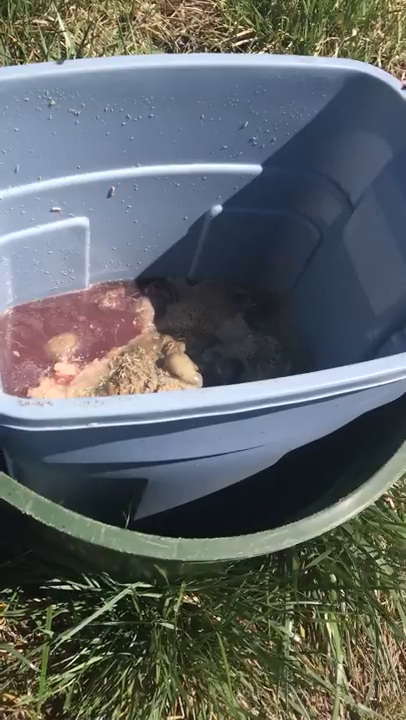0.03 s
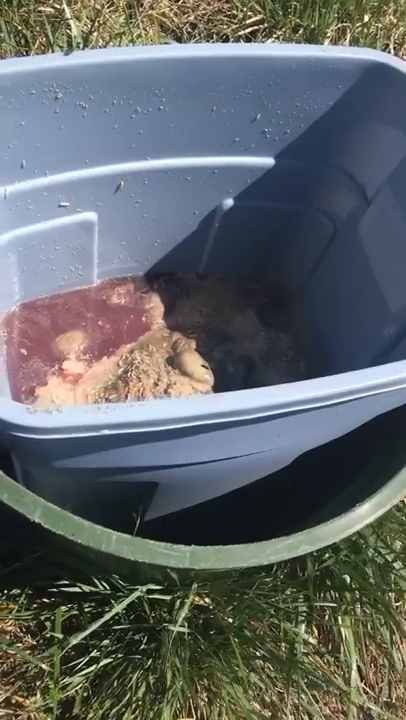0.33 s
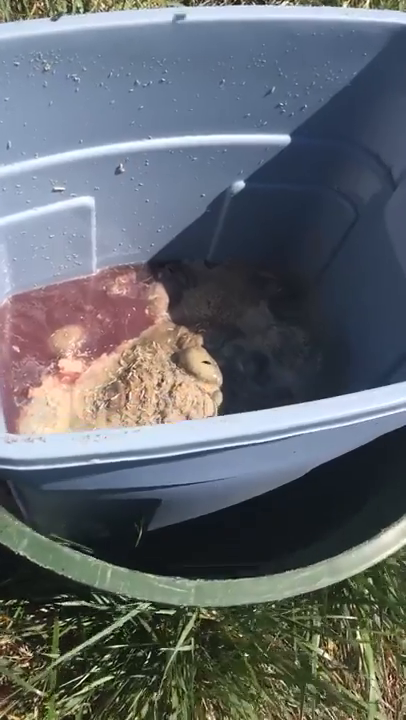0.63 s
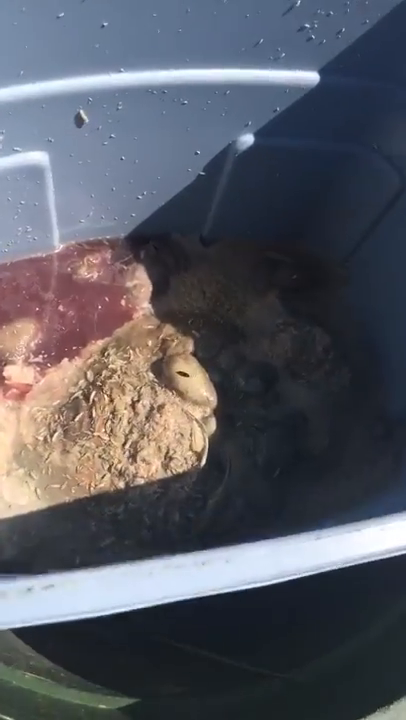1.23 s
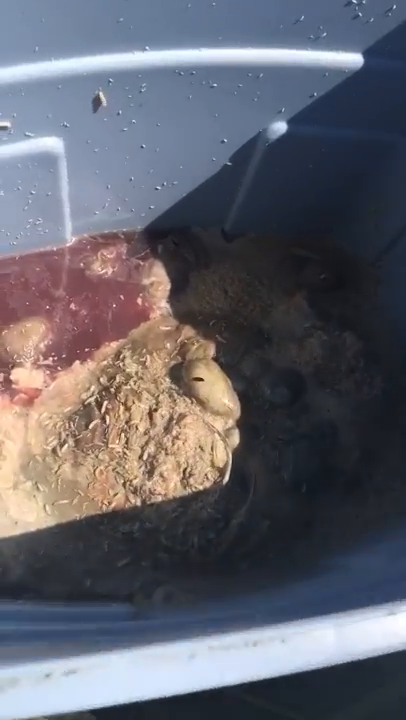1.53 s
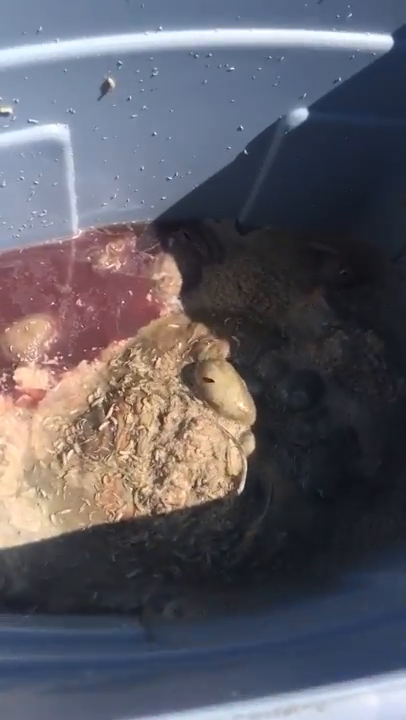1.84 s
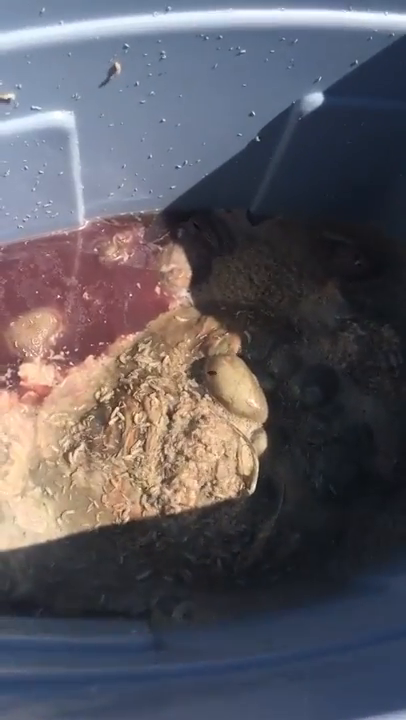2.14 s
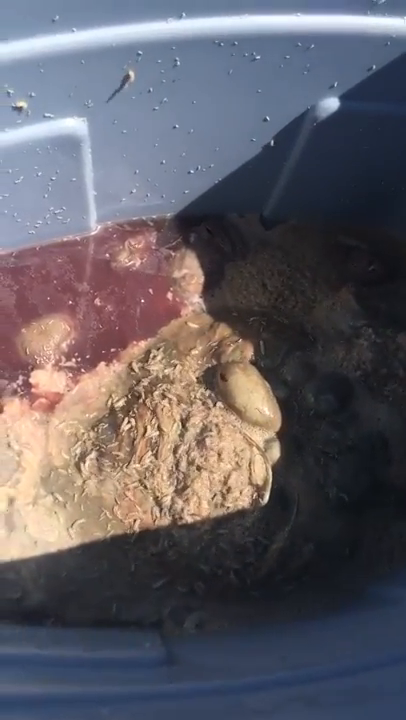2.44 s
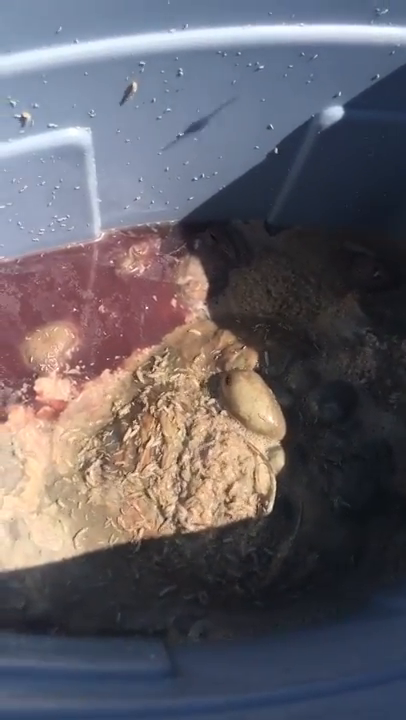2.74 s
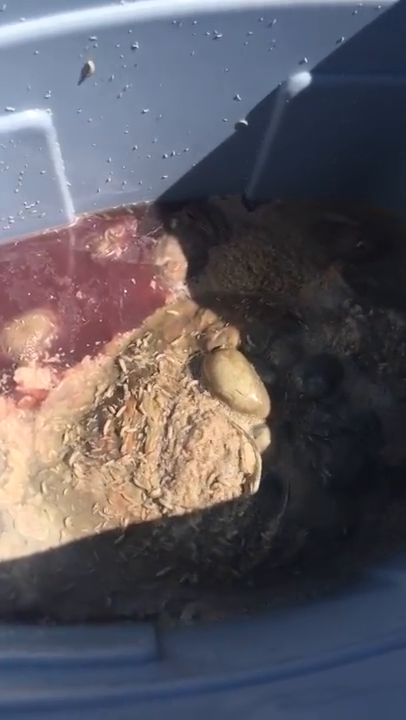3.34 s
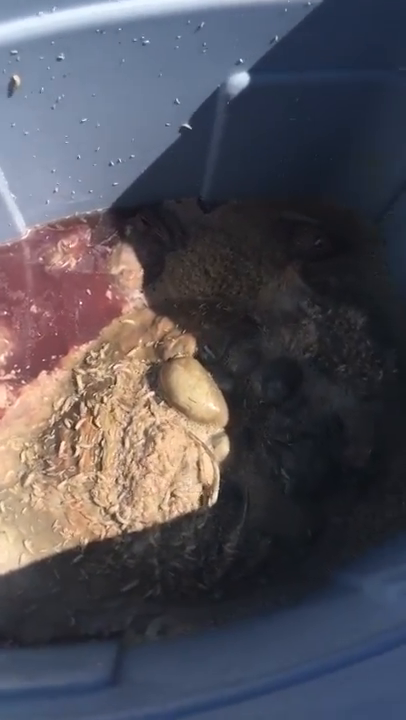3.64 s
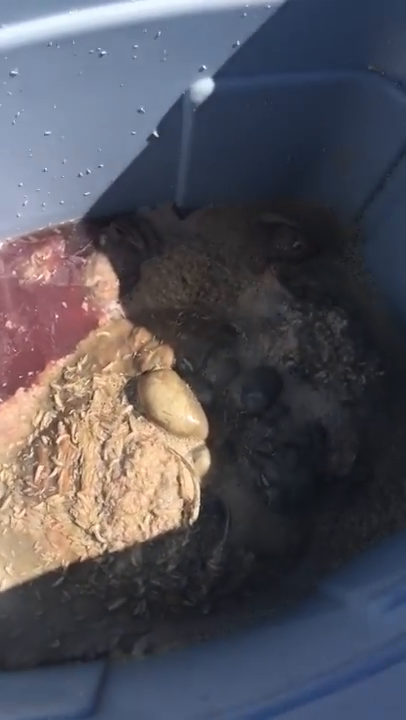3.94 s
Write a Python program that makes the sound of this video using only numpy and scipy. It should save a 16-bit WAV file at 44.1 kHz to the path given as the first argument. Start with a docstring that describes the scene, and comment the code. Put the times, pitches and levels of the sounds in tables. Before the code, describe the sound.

A low, uneven wind rumble blows on a microphone held over a plastic bin outdoors. Grass or a sleeve rustles briefly with faint ticks, then the plastic clicks once sharply, and the gusts swell again near the end.

```python
"""A quiet lawn, with a phone microphone leaned over a plastic bin.
Light wind buffets the microphone in low gusts. A sleeve or grass brushes past twice, its fibres
catching and slipping, and small ticks follow. Close by, the plastic cracks and rings in one sharp click.
A faint hush of distant air and the microphone's own hiss lie underneath."""
import sys
import numpy as np
from scipy import signal
from scipy.fft import rfft, irfft
from scipy.io import wavfile
from scipy.ndimage import uniform_filter1d

SR = 44100
rng = np.random.default_rng(int(sys.argv[2]) if len(sys.argv) > 2 else 0)


def digitize_waveform(pressure):
    """Quantize a signal to 16-bit integers and store it at the path in sys.argv[1].

    Rows of a 2-D input are taken as channels; values are limited to [-1, 1].
    """
    field = np.atleast_2d(pressure).T
    bounded = np.clip(field, -1, 1)
    quanta = np.round(bounded * 32767).astype(np.int16)
    wavfile.write(sys.argv[1], SR, quanta)


N = 176400


# Spectra of the wind's deep rumble and of its faster eddies: frequency_hz, gain_db
RUMBLE_SPECTRUM = [(10, -1.5), (25, 1), (40, -2), (60, -5), (90, -11), (130, -18.5), (200, -33), (400, -64),
                   (1500, -120)]
EDDY_SPECTRUM = [(50, -14), (100, -1.5), (150, -0.5), (220, -5), (300, -15.5), (420, -22), (700, -42),
                 (1500, -75), (4000, -110)]
# Gusts right on the microphone: peak_s, half_length_s, rumble_db, eddy_db
MIC_GUSTS = [(0.338, 0.028, -35.5, -57), (0.415, 0.049, -41, -63), (0.543, 0.034, -38, -62),
             (0.62, 0.0081, -27.5, -44.5), (0.669, 0.019, -32, -48), (0.731, 0.019, -36.5, -39),
             (0.8, 0.047, -42, -60), (0.934, 0.019, -41.5, -68), (1.185, 0.048, -39, -57.5),
             (1.276, 0.02, -39.5, -66), (1.33, .018, -36.5, -74), (1.665, 0.028, -44.5, -71),
             (1.94, 0.019, -45, -63.5), (2.112, 0.037, -42.5, -67.5), (2.38, 0.016, -43, -83),
             (2.648, 0.043, -44.5, -68.5), (3.055, 0.095, -42.5, -69.5), (3.53, 0.024, -41, -53),
             (3.577, 0.024, -28.5, -46), (3.634, 0.0076, -32.5, -46), (3.68, 0.036, -39, -63),
             (3.808, 0.059, -39, -59), (3.887, 0.0086, -32, -55)]

def wind(t, breeze_rumble_db=-50, breeze_eddy_db=-69, flutter_db=2.5, flutter_hz=29.72):
    """A steady breeze and short gusts press on the microphone and shed faster, fluttering eddies."""
    rumble_power, eddy_power = undb(breeze_rumble_db) ** 2, undb(breeze_eddy_db) ** 2
    for peak_s, half_length_s, rumble_db, eddy_db in MIC_GUSTS:
        swell = bell(t, peak_s, half_length_s)
        rumble_power += (swell * undb(rumble_db)) ** 2
        eddy_power += (swell * undb(eddy_db)) ** 2
    rumble = np.sqrt(rumble_power) * noise(RUMBLE_SPECTRUM)
    eddies = np.sqrt(eddy_power) * noise(EDDY_SPECTRUM)
    return rumble + eddies * undb(flutter_db * wander(flutter_hz))


# Spectrum of a bright snap, in the click and in the ticks: frequency_hz, gain_db
SNAP_SPECTRUM = [(1500, 6), (3300, -0.5), (5500, 2.5), (8000, -1.5), (11000, 1), (14300, 5), (16000, -4.5)]
# Modes the plastic rings with: pitch_hz, gain_db, t60_s
PLASTIC_MODES = [(402, -24, 0.021), (765, -14, 0.02), (1190, -4, 0.011), (1496, -1, 0.015),
                 (3490, -3, 0.0043), (5300, -5, 0.0058), (11840, -10, 0.012), (14600, -11, .008)]
# Cracks close to the microphone (a light touch, the slip, the stop): start_s, level_db
CLICK_CRACKS = [(1.8118, -62), (1.8130, -41), (1.8141, -39.5)]

def plastic_click(ring_start_s=1.8136, ring_db=-37.5, tail_gain_db=-19):
    """Close by, quick cracks with a short bright tail; the damped plastic rings for some milliseconds."""
    out = np.zeros(N)
    ringing = sum(undb(gain_db) * ring(pitch_hz, t60_s) for pitch_hz, gain_db, t60_s in PLASTIC_MODES)
    add(out, ring_start_s, undb(ring_db) * ringing)
    for start_s, level_db in CLICK_CRACKS:
        crack = burst(SNAP_SPECTRUM, decay_s=0.00058)
        tail = undb(tail_gain_db) * burst(SNAP_SPECTRUM, decay_s=0.0051)
        add(out, start_s, undb(level_db) * (crack + tail))
    return out


# Spectra of the rustle's bright scratch and hollow body: frequency_hz, gain_db
SCRATCH_SPECTRUM = [(1200, 10), (2300, -6), (3300, 0.5), (4300, 1), (5500, -1.5), (8000, -4.5),
                    (10500, 0.5), (13800, 2.5), (16000, -0.5)]
BODY_SPECTRUM = [(300, -16), (600, -5), (950, -10.5), (1250, -1.5), (1520, -2.5), (1850, -8.5),
                 (2300, -19.5), (4000, -27), (12000, -62)]
# Two strokes past the microphone, then faint stirring: time_s, scratch_db, body_db
BRUSH_LEVELS = [(0.25, -81.5, -74.5), (0.34, -75, -68.5), (0.39, -80, -74), (0.45, -85, -77),
                (0.50, -77.5, -68), (0.56, -67, -66), (0.59, -72.5, -69), (0.636, -61, -58.5),
                (0.657, -75.5, -62.5), (0.681, -60.5, -62), (0.73, -70.5, -65.5), (0.79, -73, -69.5),
                (0.84, -82.5, -73.5), (1.0, -89, -83.5), (1.1, -88, -76.5), (1.24, -88.5, -84),
                (1.35, -95, -97), (3.5, -110, -110), (3.82, -89, -83)]

def rustle(t, fade_in_s=0.26, flicker_db=2.5, flicker_hz=89.83, catch_db=2.35, catch_hz=151.5):
    """Fibres catch and slip, each group at its own pitch: a bright scratch over a hollow resonance."""
    def slips():
        return grains(per_s=1500, spread_db=2) * undb(flicker_db * wander(flicker_hz))

    fibres = np.zeros(N)
    for hz in np.geomspace(2400, 14500, num=10):
        band = [(hz / 2, -30), (hz / 1.15, -6), (hz, 0), (hz * 1.15, -6), (hz * 2, -30)]
        fibres += np.sqrt(hz) * colour(slips(), band)
    time_s, scratch_db, body_db = np.array(BRUSH_LEVELS).T
    scratch = undb(np.interp(t, time_s, scratch_db)) * colour(fibres, SCRATCH_SPECTRUM)
    body = undb(np.interp(t, time_s, body_db)) * colour(slips(), BODY_SPECTRUM)
    contact = np.minimum(t / fade_in_s, 1) ** 2
    return contact * (scratch + body) * undb(catch_db * wander(catch_hz))


# Small handling ticks at the bin: start_s, snap_db, snap_centre_hz, knock_db
HANDLING_TICKS = [(0.1925, -73, 1900, -48), (0.288, -67, 5000, -81), (0.3466, -63, 13000, -74),
                  (0.3639, -73, 3000, -50.5), (0.396, -78, 3000, -56), (0.5378, -67.5, 1900, -49),
                  (0.598, -55.5, 12900, -70), (0.64, -59, 4200, -64), (0.666, -55, 12000, -54),
                  (0.7643, -60, 9500, -74), (0.771, -74, 3000, -58), (0.802, -62, 12000, -73),
                  (0.8485, -79, 4000, -61.5), (0.8746, -72, 3600, -53), (0.9085, -55.5, 12300, -55),
                  (0.923, -63, 13500, -68), (1.169, -67.5, 5470, -84), (1.190, -66, 9800, -74),
                  (1.201, -67, 7500, -76), (1.227, -69, 5940, -86), (1.389, -64, 11600, -73),
                  (1.404, -64.5, 9000, -56.5), (1.433, -71, 11000, -58.5), (1.5054, -66.5, 13000, -82),
                  (1.624, -66.5, 8400, -82), (1.651, -68, 5500, -79), (1.678, -71.5, 13500, -84),
                  (1.765, -72, 9000, -82), (2.758, -72, 3200, -74), (3.325, -75, 12000, -80),
                  (3.563, -70.5, 3200, -71), (3.6758, -62.5, 13100, -72), (3.792, -67.5, 2600, -64),
                  (3.817, -76, 13000, -82), (3.835, -73, 11000, -82)]

def ticks(knock_hz=1395, pitch_spread=0.075):
    """Each tick is a bright snap with a short hollow knock, a little different in pitch every time."""
    out = np.zeros(N)
    pitches_hz = knock_hz * (1 + pitch_spread * rng.standard_normal(len(HANDLING_TICKS)))
    for (start_s, snap_db, snap_centre_hz, knock_db), pitch_hz in zip(HANDLING_TICKS, pitches_hz):
        spectrum = with_resonance(SNAP_SPECTRUM, snap_centre_hz)
        add(out, start_s, undb(snap_db) * burst(spectrum, decay_s=0.0029))
        add(out, start_s, undb(knock_db) * ring(pitch_hz, t60_s=0.015))
    return out


def crackle(t, level_db=-86.5, decay_s=0.001):
    """Tiny random snaps, fainter than the ticks, swell and fade."""
    impulses = abs(grains(per_s=76, spread_db=2.6))
    decays = signal.lfilter([1], [1, -np.exp(-1 / (decay_s * SR))], impulses)
    swell = bell(t, centre=1.12, width=1)
    return undb(level_db) * swell * unit(decays * noise(SNAP_SPECTRUM))


# Spectrum of the air over the lawn together with microphone hiss: frequency_hz, gain_db
HUSH_SPECTRUM = [(150, -5.5), (300, -5.5), (500, -4), (800, -5.5), (1200, -6), (1500, -10.5), (1950, -17.5),
                 (2700, -21), (4500, -24), (8000, -27), (12000, -27.5), (15800, -29.5)]

def hush(level_db=-73):
    """Distant outdoor air and the microphone's steady hiss."""
    return noise(HUSH_SPECTRUM) * undb(level_db)


def undb(db):
    """Decibels to gain."""
    return 10 ** (np.asarray(db) / 20)


def unit(x):
    """Scale to rms 1."""
    return x / np.sqrt(np.mean(x ** 2))


def bell(x, centre, width):
    """Gaussian curve of height 1."""
    return np.exp(-((x - centre) / width) ** 2 / 2)


def colour(x, spectrum):
    """Filter by a spectrum of (frequency_hz, gain_db) points; rms 1."""
    hz, db = np.array(spectrum, float).T
    bins_hz = np.maximum(np.fft.rfftfreq(len(x), 1 / SR), 1)
    gain = undb(np.interp(np.log(bins_hz), np.log(hz), db))
    return unit(irfft(rfft(x) * gain, len(x)))


def with_resonance(spectrum, centre_hz, boost_db=4.5, width_octaves=0.26):
    """A spectrum with one broad resonance added."""
    hz, db = np.array(spectrum, float).T
    grid_hz = np.geomspace(500, SR / 2, num=60)
    bump_db = boost_db * bell(np.log2(grid_hz), np.log2(centre_hz), width_octaves)
    return np.column_stack([grid_hz, np.interp(np.log(grid_hz), np.log(hz), db) + bump_db])


def noise(spectrum):
    """Coloured noise of rms 1."""
    return colour(rng.standard_normal(N), spectrum)


def wander(rate_hz):
    """Smooth random drift of rms 1."""
    hold = max(int(SR / rate_hz), 2)
    steps = rng.standard_normal(N)[np.arange(N) // hold]
    return unit(uniform_filter1d(steps, hold))


def grains(per_s, spread_db):
    """Random impulses of uneven size and either sign."""
    hits = rng.random(N) < per_s / SR
    size = np.minimum(rng.exponential(size=N), 2 * np.e)
    sign = np.sign(rng.standard_normal(N))
    return hits * sign * undb(spread_db * size)


def ages():
    """Seconds since the start of a short event."""
    return np.arange(4096) / SR


def ring(pitch_hz, t60_s):
    """One struck mode, falling 60 dB in t60_s."""
    return np.exp(-np.log(1000) * ages() / t60_s) * np.sin(2 * np.pi * pitch_hz * ages())


def burst(spectrum, decay_s):
    """Coloured noise with a sudden attack and an exponential fall."""
    return colour(rng.standard_normal(len(ages())), spectrum) * np.exp(-ages() / decay_s)


def add(out, start_s, sound):
    """Mix a short sound in at a time."""
    i = int(np.clip(start_s * SR, 0, N))
    out[i:i + len(sound)] += sound[:N - i]


def scene():
    """Everything that reaches the one microphone over the bin."""
    t = np.arange(N) / SR
    return (wind(t) + rustle(t) + ticks() + crackle(t) + plastic_click() + hush())[None]


def record(dry, open_s=0.058, ramp_s=0.0016, top_hz=15850):
    """The phone microphone opens after a moment and cuts the highest treble."""
    opened = np.clip((np.arange(N) / SR - open_s) / ramp_s, 0, 1)
    low_pass = signal.ellip(10, 0.1, 70, top_hz, fs=SR, output="sos")
    return signal.sosfilt(low_pass, dry * opened)


dry = scene()
out = record(dry)
digitize_waveform(out)
```